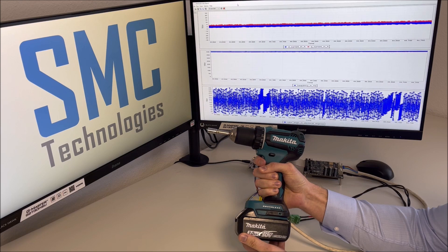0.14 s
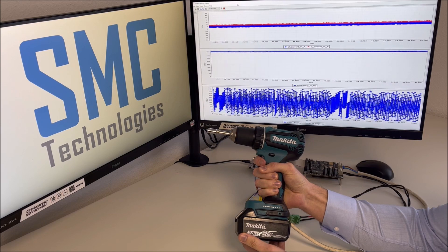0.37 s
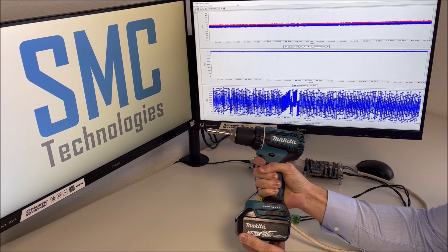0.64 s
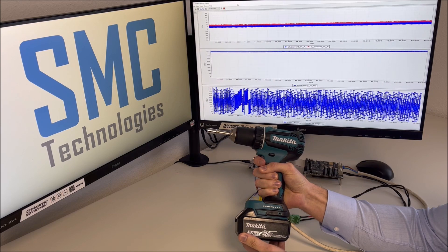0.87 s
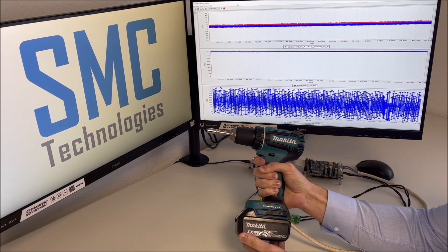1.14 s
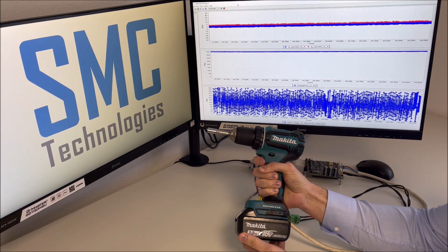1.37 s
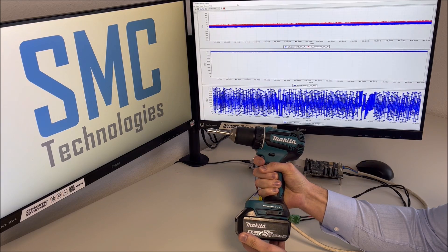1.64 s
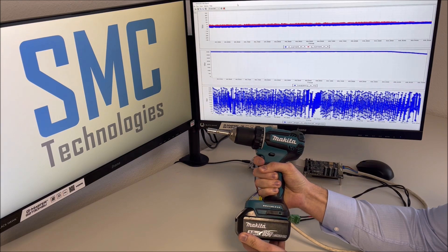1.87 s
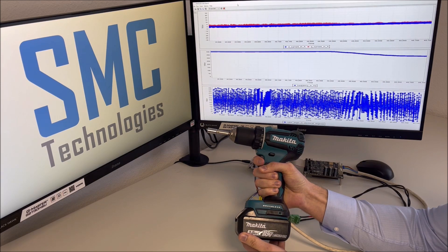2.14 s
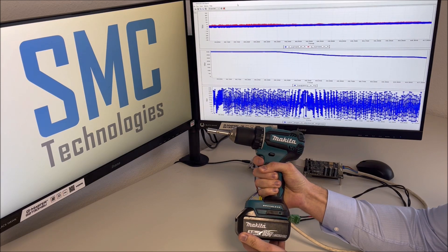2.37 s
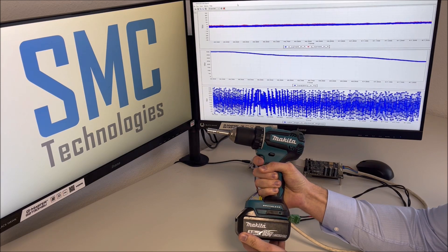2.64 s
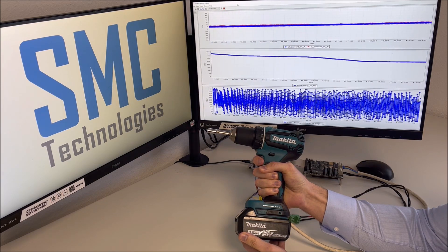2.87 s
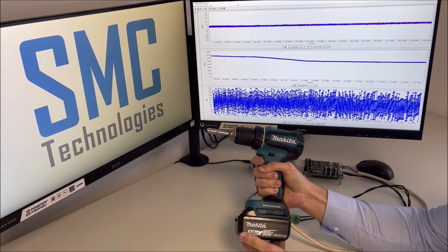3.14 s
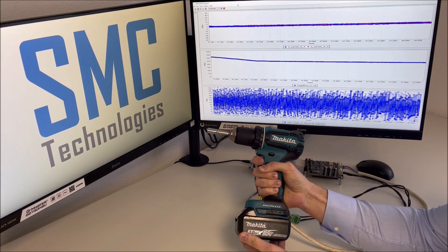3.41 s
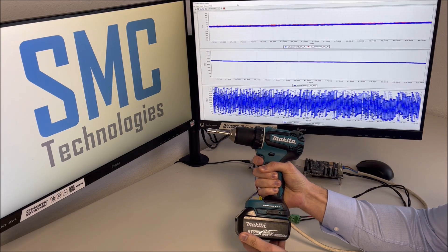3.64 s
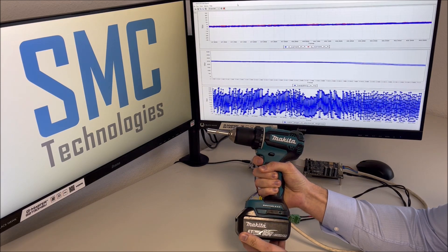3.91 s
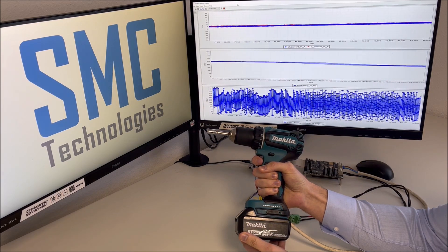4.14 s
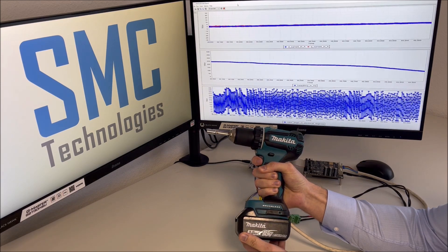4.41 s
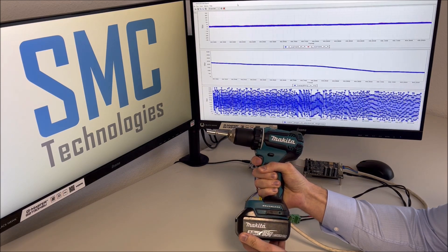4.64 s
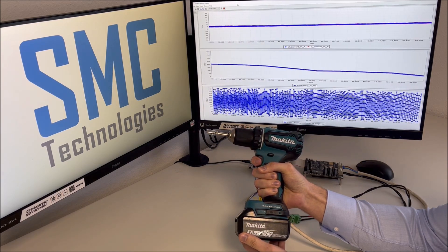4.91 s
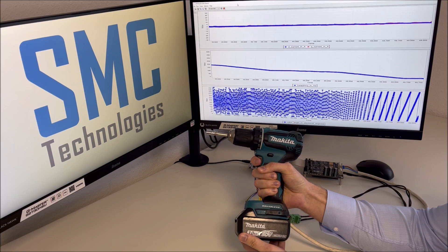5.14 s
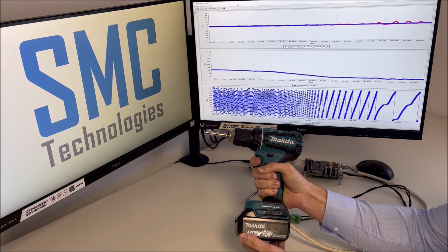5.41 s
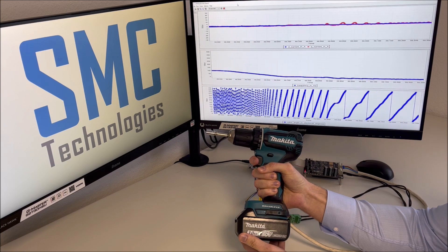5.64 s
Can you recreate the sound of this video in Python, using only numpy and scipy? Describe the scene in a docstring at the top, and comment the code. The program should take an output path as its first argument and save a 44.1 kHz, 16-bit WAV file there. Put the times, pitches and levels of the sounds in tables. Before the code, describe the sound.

Close stereo sound of a drill in a small lab with short echoes. A loud, steady buzzing whine with dense rattle and airy hiss slides down by steps as the trigger is released, individual tones swelling through resonances. By four and a half seconds only weak, rough gear noise remains, catching unevenly with muffled clunks and light ticks until it stops.

```python
"""A drill whines and rattles at full speed, drops in pitch by steps, then clunks and ticks to rest in a small hard room.
The motor's tones are sines tied to the shaft angle. The gear rattle, growl and fan hiss are knocks and noise,
shaped by the housing. Short noise bursts make the clunks and ticks, and a low sine is the gear carrier's hum.
Two microphone ports hear the hand-held cordless drill from different sides, with room echoes and a faint rumble."""
import sys
import numpy as np
from scipy import signal
from scipy.fft import rfft, irfft, next_fast_len
from scipy.io import wavfile
from scipy.ndimage import uniform_filter1d

SR = 44100
rng = np.random.default_rng(int(sys.argv[2]) if len(sys.argv) > 2 else 0)


def amplitude_ratio(level_db):
    """Convert a level in decibels to the matching linear amplitude (field) ratio."""
    exponent = np.asarray(level_db, float) / 20
    return 10 ** exponent


def transcribe(signal):
    """Save signal, clipped to [-1, 1], as a 16-bit WAV file at the path in sys.argv[1]."""
    frames = np.atleast_2d(signal).T
    limited = np.clip(frames, -1, 1)
    pcm = np.round(limited * 32767).astype(np.int16)
    wavfile.write(sys.argv[1], SR, pcm)


N = 254898
PADDED = next_fast_len(N + SR // 2)  # samples, with space for the echoes
HZ = np.maximum(np.fft.rfftfreq(PADDED, 1 / SR), 1)

# Colour of the room rumble. Each row: frequency in Hz, relative level in dB per Hz.
ROOM_COLOUR = [(25, -14.5), (45, -25.5), (70, -7), (110, -7.5), (170, -14), (300, -10.5), (900, -10),
               (3000, -14.5), (16000, -56)]
# Loudness of the room rumble, before its slow wavering. Each row: time in seconds, level in dB.
ROOM_LOUDNESS = [(0.0, -66), (1.75, -72), (2.0, -59), (2.21, -59), (2.27, -78), (2.5, -66), (4.3, -64.5),
                 (4.92, -62.5), (5.1, -66.5), (5.78, -79)]
ROOM_T60_S, ROOM_DB, ROOM_DULL_HZ = 0.25, -4, 6500
SONG_IN_ROOM_DB = -8  # tones are sent to the room more weakly, so steady tones keep an even level

# How much louder the left port hears than the right. Each row: frequency in Hz, left over right in dB.
PORT_LIFT = [(250, -3), (400, -3.5), (700, -2), (1200, -1), (2000, 1), (3000, 5), (3600, 5), (4200, 12),
             (4700, 17), (5400, 11.5), (6200, 6), (7000, -0.5), (15000, -1)]
# How far the left port leads the right. Each row: frequency in Hz, lead in radians.
LEFT_LEAD = [(100, 0), (1000, .2), (1500, -.8), (2600, .8), (3500, .1), (4700, .9), (5700, -2.6),
             (7000, -2.2), (7600, -2.4), (8400, -3.1), (8800, -3.2), (9200, -3.9), (10800, -5.4),
             (11500, -6.2), (12800, -6.4), (13200, -7.5), (15000, -9.3)]
# How much of the power both ports hear alike. Each row: frequency in Hz, share from 0 to 1.
SHARE_ALIKE = [(100, .6), (300, 1), (700, 0.6), (1000, 0.93), (1500, 0.12), (2000, 0.66), (3000, 0.41),
               (4300, 0.2), (6300, 0.72), (7200, 0.52), (8000, 0.87), (8800, 0.83), (10000, 0.96),
               (12000, .92), (13300, 0.47), (15500, 0.88)]

# Hum of the planet carrier, before wavering and the ports. Each row: time in seconds, level in dB.
CARRIER_HUM = [(0, -76), (1.2, -73.5), (1.75, -74), (1.9, -61), (2.2, -70), (2.3, -89), (4.4, -84.5)]
# Gears and trigger tick as the drill comes to rest. Each row: start in seconds, burst level in dB before filtering.
TICK_BURSTS = [(5.012, -65.5), (5.0574, -70), (5.24, -62), (5.246, -56), (5.266, -60.5), (5.3464, -70),
               (5.3832, -70), (5.4574, -70.5), (5.4774, -69)]
# The gearbox catches in its last turns. Each row: start in seconds, burst level in dB before filtering.
CLUNK_BURSTS = [(4.8392, -25.5), (4.8648, -32.5), (4.9322, -26.5), (5.0286, -37), (5.1638, -38),
                (5.3036, -41), (5.344, -43), (5.476, -48)]

# Shaft speed as the trigger is let out in steps. Each row: time in seconds, speed in turns per second.
SHAFT_SPEED = [(0.0, 403.1), (1.55, 403.7), (1.65, 401.5), (1.75, 377.4), (1.85, 354.3), (1.95, 341.3),
               (2.2, 325.0), (2.3, 314), (2.5, 264.9), (2.6, 257.8), (3.0, 248.9), (3.4, 244.4),
               (3.5, 237.1), (3.7, 214.5), (3.9, 201.9), (4.0, 197), (4.1, 181.4), (4.27, 147.3),
               (4.35, 124.0), (4.45, 111), (4.9, 55.6), (5.3, 29.8)]
# Base level of the rattle, which the motor tones follow too. Each row: time in seconds, level in dB.
RATTLE_LEVEL = [(0, -24.5), (1.5, -25.5), (2.3, -28), (2.75, -30.5), (3.4, -30.5), (4.1, -34), (4.4, -39),
                (4.65, -40), (4.85, -44), (4.94, -49), (5.02, -54.5), (5.12, -58), (5.27, -61.5),
                (5.36, -65), (5.49, -61), (5.56, -67.5), (5.78, -81.5)]
# The fan dies away and the gearbox comes forward as the shaft slows.
# Each row: speed in turns per second, hiss in dB against the rattle, growl in dB against the rattle.
HISS_AND_GROWL = [(29.6, -27, -7.5), (48, -30, -6.5), (60, -23, -7), (110.8, -22, -8.5), (150, -21, -8),
                  (185, -18.5, -11.5), (250, -18, -13), (305, -15, -12.5), (403, -10.5, -12)]
# The sound thins from below as the drill slows. Each row: time in seconds, low edge in Hz.
THINNING_EDGE = [(0, 327), (2.3, 306), (2.6, 322), (3.0, 357), (3.5, 486), (4.0, 669.6), (4.3, 729),
                 (4.6, 990), (5.0, 917), (5.78, 1000)]
EDGE_DB_PER_OCT = 50.5
# Colour of rattle and hiss at full speed. Each row: frequency in Hz, relative level in dB per Hz.
WHIRR_COLOUR = [(250, -15), (450, -11.5), (800, -10.5), (1050, -7.5), (1500, -2.5), (1800, -6),
                (2400, -6.5), (3400, -4.5), (4000, -2), (4800, -7.5), (6200, -5.5), (8500, -4.5),
                (11000, -8.5), (12200, -8.5), (12800, -11), (15600, -10.5)]
# Resonances of the housing. Each row: centre in Hz, width in Hz, lift above the whirr in dB.
HOUSING_BUMPS = [(1010, 100, 5), (1180, 160, 3), (1630, 60, 3), (2140, 130, 3), (3235, 90, 3.5),
                 (3900, 150, 3), (4280, 220, 3), (4740, 100, 3), (12300, 340, 3)]
TEETH_PER_TURN, CRAWL_TURNS_PER_S = 14, 50
GROWL_BELOW_HZ, GROWL_FULL_DB = 4900, -12.5
FAN_FROM_HZ, FAN_FULL_DB = 5330, -11.5

# The main motor tones: unbalance, pole pairs, fifth order, twice the pole pairs, planet gear mesh,
# four times the pole pairs, second gear mesh, slot passing. Each entry: multiple of the shaft rate.
TONE_MULTIPLES = [1, 4, 5, 8, 10.5625, 16, 20.32, 24]
# Their strength at full speed, away from resonance. Each entry: dB against the rattle.
TONE_DB = [-21, -20.5, -34, -20.5, -19, -22.5, -23.5, -19.5]
# Their gain as the shaft slows. Each entry: dB per octave of slowing.
TONE_SLOWING_DB = [-4, 10, 17, 3, -4, 11, 8, 0]
# A tone swells as it crosses a narrow resonance of motor can or gear case, and sinks in the dip below them.
# Each row: centre in Hz, width in Hz, lift in dB (negative for the dip).
TONE_CROSSINGS = [(835, 178, -10.5), (1008, 167, 10), (1126, 100, 9.5), (1229, 66, 8.5), (1656, 110, 5.5),
                  (2113, 150, 6.5), (2730, 120, 3), (3006, 97, 11.5), (3252, 260, 4), (4100, 68, 5.5),
                  (4275, 190, 15.5), (5020, 140, 11), (5460, 200, 6.5), (6070, 500, 10), (7980, 300, 15),
                  (9490, 230, 6)]
# Fainter tones and gear sidebands. Each entry: multiple of the shaft rate.
FAINT_TONES = [2, 3, 6, 6.38, 7, 9, 9.44, 9.75, 11.105, 11.67, 12, 26, 48]
# Their strength before the housing colours them. Each entry: dB against the rattle.
FAINT_TONE_DB = [-30.5, -37, -28.5, -17, -23, -27.5, -17, -14.5, -14.5, -12.5, -18.5, -29, -35.5]
SILENT_TURNS_PER_S, FADE_TURNS_PER_S = 150, 44  # silent at or below the first, full once above it by the second


def rms_one(x):
    """Scale to unit power."""
    return x / np.sqrt(np.mean(x ** 2) + 1e-20)


def in_time(rows, at=None):
    """Read a table's columns at every sample, or at given values of its first column."""
    first, *columns = np.transpose(rows)
    at = np.arange(N) / SR if at is None else at
    return [np.interp(at, first, column) for column in columns]


def at_hz(points, hz):
    """Read a frequency table on a log axis."""
    table_hz, values = np.array(points).T
    return np.interp(np.log(hz), np.log(table_hz), values)


def drift(rate):
    """Slow random wander of roughly unit spread, with a new random point 2 * rate times a second."""
    points = rng.standard_normal(int(N / SR * rate * 2) + 2)
    return np.interp(np.arange(N) / SR * rate * 2, np.arange(len(points)), points)


def bumps_db(resonances, hz):
    """Add up the lift in dB of resonances, each strongest at its centre."""
    return sum(db / (1 + ((hz - centre_hz) / (width / 2)) ** 2) for centre_hz, width, db in resonances)


def thinned_db(hz, edge_hz):
    """Steep loss in dB below the low edge."""
    return EDGE_DB_PER_OCT * np.clip(np.log2(edge_hz / hz), 0, None)


def housing_db(hz):
    """Whirr colour with the housing's resonant bumps."""
    return at_hz(WHIRR_COLOUR, hz) + bumps_db(HOUSING_BUMPS, hz)


def room_tone(alike=0.72):
    """Low wavering rumble made of coloured noise, mostly shared by both ports."""
    white = rng.standard_normal((3, N))
    both = np.sqrt(alike) * white[0] + np.sqrt(1 - alike) * white[1:]
    rumble = irfft(rfft(both, PADDED) * amplitude_ratio(at_hz(ROOM_COLOUR, HZ)), PADDED)[:, :N]
    return rms_one(rumble) * amplitude_ratio(in_time(ROOM_LOUDNESS)[0] + 3.0 * drift(7.1))


def room_echoes():
    """Two unrelated dense decays, one per port, as spectra; walls and air dull them."""
    t = np.arange(SR // 2) / SR
    decay = amplitude_ratio(-60 * t / ROOM_T60_S)
    tail = rng.standard_normal((2, len(t))) * decay * np.clip(t / 0.013, 0, 1)
    spectrum = rfft(rms_one(tail) / np.sqrt(len(t)), PADDED)
    return amplitude_ratio(ROOM_DB) * spectrum / (1 + (HZ / ROOM_DULL_HZ) ** 4)


def ports(shared, separate, song):
    """Shared sound reaches the left port shifted in phase, the room answers; the left duct lifts the upper middle."""
    shift = np.interp(HZ, *np.transpose(LEFT_LEAD))
    lift = amplitude_ratio(at_hz(PORT_LIFT, HZ))
    unchanged = np.ones_like(HZ)
    direct = (shared + song) * np.array([np.exp(1j * shift), unchanged]) + separate
    into_room = shared + separate + amplitude_ratio(SONG_IN_ROOM_DB) * song
    heard = direct + room_echoes() * into_room
    return irfft(heard * np.array([lift, unchanged]), PADDED)[:, :N]


def carrier(turns):
    """The planet carrier turns at 3/16 of the shaft rate and hums unevenly."""
    level = amplitude_ratio(in_time(CARRIER_HUM)[0] + 2.5 * drift(8))
    return level * np.sin(2 * np.pi * (turns * 3 / 16 + 0.2 * drift(6)))


def dying_bursts(rows, length, decay_s, band_hz):
    """Short noise bursts that die away exponentially, then pass a band filter."""
    out = np.zeros(N)
    fade = np.exp(-np.arange(length) / SR / decay_s)
    for start_s, db in rows:
        at = round(start_s * SR)
        out[at:at + length] += amplitude_ratio(db) * rng.standard_normal(length) * fade
    return signal.sosfilt(signal.butter(2, band_hz, "band", fs=SR, output="sos"), out)


def ticks():
    """Each tick is a short noise burst dying in a few ms."""
    return dying_bursts(TICK_BURSTS, 600, 0.0038, [1000, 11000])


def clunks():
    """Each catch thumps the gearbox shell, which rings briefly as narrow-band noise."""
    return dying_bursts(CLUNK_BURSTS, 900, 0.0073, [1000, 1500])


def whirr_drive(speed, grit_db=2.5, fast_hiss=0.9, slow_hiss=0.79, throb_db=0.29, catch_db=4.0):
    """Loose teeth knock at random, at a rate set by the speed, over bearing and air noise."""
    knocks = rng.random(N) < TEETH_PER_TURN * speed / SR
    # one row for each part of the housing, with its own random signs
    sizes = amplitude_ratio(grit_db * np.minimum(rng.exponential(1, N), 2.5)) * rng.choice([-1, 1], (3, N))
    hits = knocks * sizes
    hits = hits / np.sqrt(uniform_filter1d(hits ** 2, size=8000) + 1e-9)  # even out their power
    # knocks stand out when slow
    hiss_share = slow_hiss + (fast_hiss - slow_hiss) * speed / speed[0]
    drive = np.sqrt(1 - hiss_share) * hits + np.sqrt(hiss_share) * rng.standard_normal((3, N))
    drive = drive * amplitude_ratio(throb_db * drift(30) + 0.23 * drift(7.3))
    # near rest the gears catch unevenly, a throb at 0.6 of the shaft rate
    crawl = np.clip(1 - speed / CRAWL_TURNS_PER_S, 0, 1)
    throb = np.cos(2 * np.pi * (np.cumsum(speed) / SR * 0.6 + 0.3 * drift(10)))
    return drive * amplitude_ratio(catch_db * crawl * throb)


def whirr(speed, mottle_db=2.18):
    """Three unrelated parts of the housing radiate the rattle: one faces both ports, the others one port each."""
    hz, s, frames = signal.stft(whirr_drive(speed), SR, nperseg=512)
    hz = np.maximum(hz, 1)[:, None]
    rattle_db, = in_time(RATTLE_LEVEL, s)
    hiss_db, growl_db = in_time(HISS_AND_GROWL, in_time(SHAFT_SPEED, s)[0])
    edge_hz, = in_time(THINNING_EDGE, s)
    # fan hiss takes over the treble, gearbox growl holds the low end
    fan = np.clip(np.log2(hz / FAN_FROM_HZ) / 1.01, 0, 1)
    low = np.clip(np.log2(GROWL_BELOW_HZ / hz) / 0.92, 0, 1)
    gain = housing_db(hz) + rattle_db - thinned_db(hz, edge_hz) + 4.5
    gain = gain + fan * (hiss_db - FAN_FULL_DB) + low * (growl_db - GROWL_FULL_DB)
    # the gearbox shell rings more plainly as the growl comes forward
    gain = gain + 0.84 * np.clip(growl_db - GROWL_FULL_DB, 0, None) / (1 + ((hz - 1120) / 160) ** 2)
    # random slow level changes across time and frequency give a mottled grain, stronger at low speed
    mottle = uniform_filter1d(rng.standard_normal(gain.shape), size=3, axis=0)
    mottle = uniform_filter1d(mottle, size=6, axis=1)
    slowness = 1.3 - np.interp(s, np.arange(N) / SR, speed) / speed[0]
    gain = gain + mottle_db * rms_one(mottle) * slowness
    return signal.istft(frames * amplitude_ratio(gain), SR)[1][:, :N]


def motor_song(speed, turns, rattle_db):
    """Near sines locked to the shaft angle, wavering a little and fading out as the shaft slows."""
    # colours are worked out every 64 samples to save time
    coarse, edge_hz = speed[::64], in_time(THINNING_EDGE)[0][::64]
    octaves_slowed = np.log2(coarse[0] / coarse)
    out = 0
    for k, db, slowing_db in zip(TONE_MULTIPLES, TONE_DB, TONE_SLOWING_DB):
        waver = 0.9 * k ** 0.33  # higher tones waver more
        swell = slowing_db * octaves_slowed + bumps_db(TONE_CROSSINGS, k * coarse)
        swell = (swell - thinned_db(k * coarse, edge_hz)).repeat(64)[:N]
        level = amplitude_ratio(rattle_db + db + swell + waver * drift(12))
        out = out + level * np.sin(2 * np.pi * (k * turns + 0.018 * waver * drift(15)))
    for k, db in zip(FAINT_TONES, FAINT_TONE_DB):
        colour = housing_db(k * coarse).repeat(64)[:N]
        level = amplitude_ratio(rattle_db + db + colour + 2.9 * drift(6))
        out = out + level * np.sin(2 * np.pi * (k * turns + 0.08 * drift(20)))
    return out * np.clip((speed - SILENT_TURNS_PER_S) / FADE_TURNS_PER_S, 0, 1)


def scene():
    """Drill through air and room to both ports, plus the room tone."""
    speed, = in_time(SHAFT_SPEED)
    turns = np.cumsum(speed) / SR
    alike = at_hz(SHARE_ALIKE, HZ)
    parts = rfft(whirr(speed) + ticks() + clunks(), PADDED)
    # keeps the tones' average power over both ports unchanged by the left port's lift
    mean_lift = np.sqrt((1 + amplitude_ratio(2 * at_hz(PORT_LIFT, HZ))) / 2)
    tones = motor_song(speed, turns, in_time(RATTLE_LEVEL)[0]) + carrier(turns)
    song = rfft(tones, PADDED) / mean_lift
    drill = ports(np.sqrt(alike) * parts[0], np.sqrt(1 - alike) * parts[1:], song)
    return drill + room_tone()


def top_cut(x):
    """Nothing passes above the cut-off."""
    return signal.sosfilt(signal.butter(12, 15670, fs=SR, output="sos"), x)


def record(dry):
    """Turn the finished mix into the sound that is saved."""
    return top_cut(dry)


dry = scene()
out = record(dry)
transcribe(out)
```